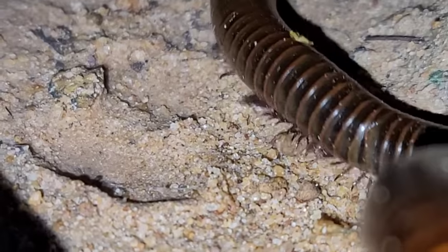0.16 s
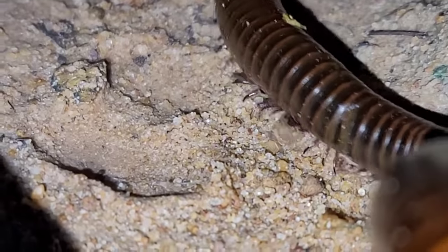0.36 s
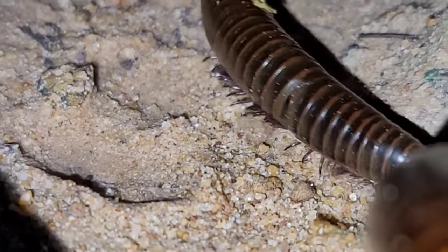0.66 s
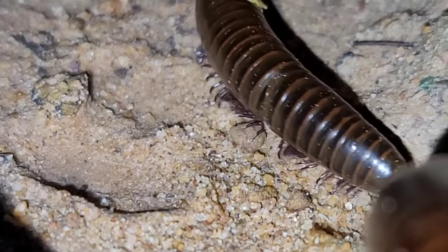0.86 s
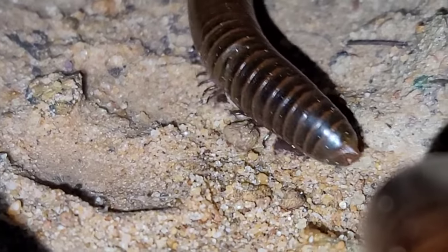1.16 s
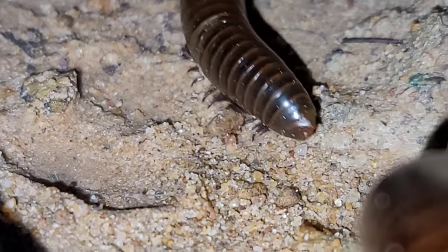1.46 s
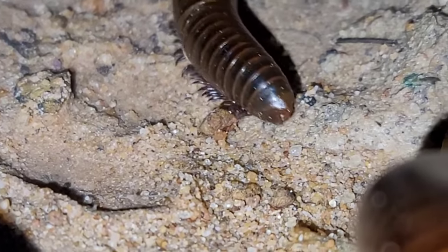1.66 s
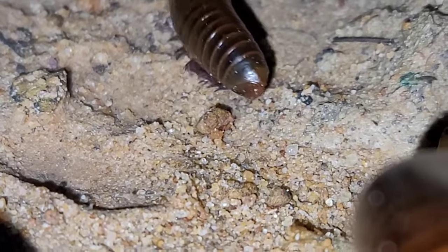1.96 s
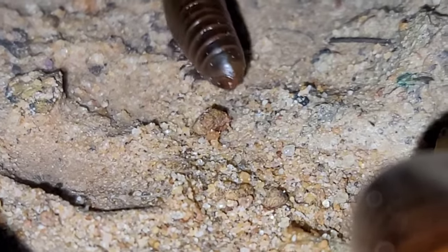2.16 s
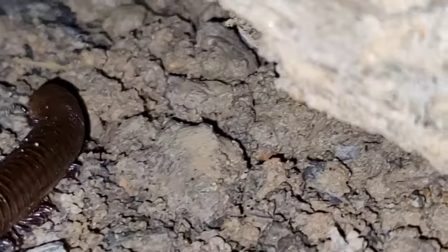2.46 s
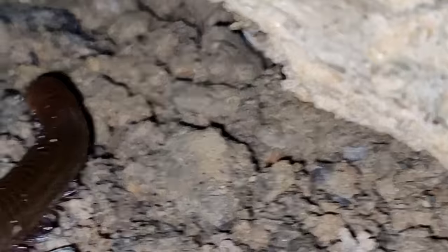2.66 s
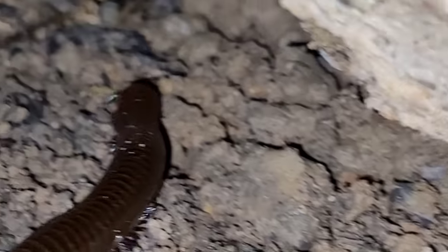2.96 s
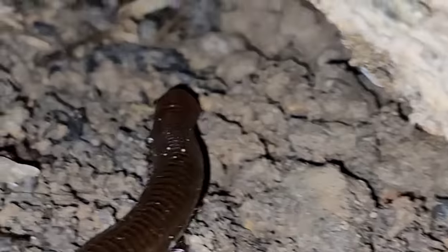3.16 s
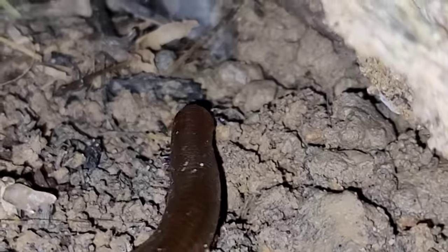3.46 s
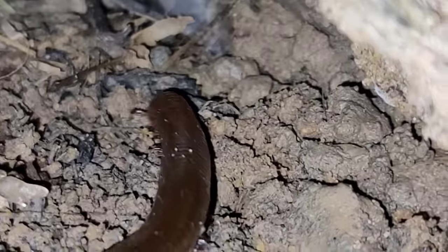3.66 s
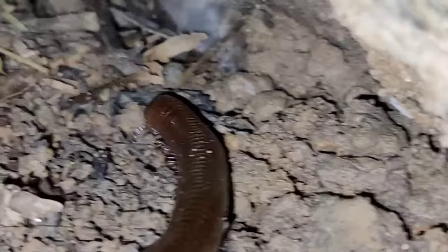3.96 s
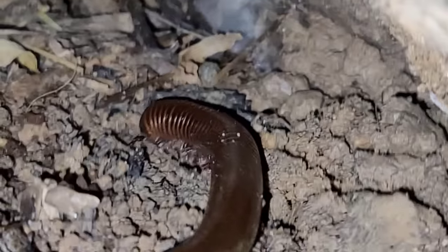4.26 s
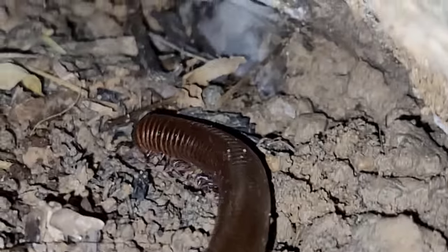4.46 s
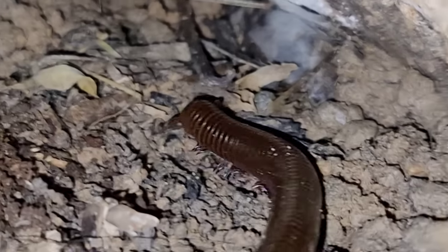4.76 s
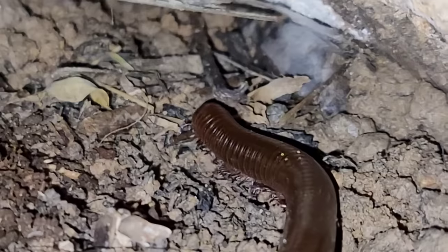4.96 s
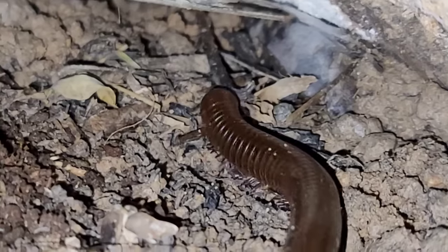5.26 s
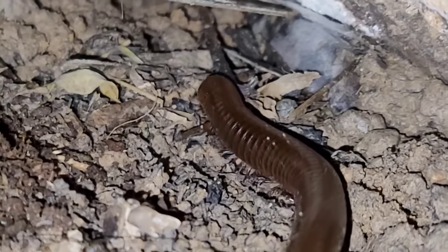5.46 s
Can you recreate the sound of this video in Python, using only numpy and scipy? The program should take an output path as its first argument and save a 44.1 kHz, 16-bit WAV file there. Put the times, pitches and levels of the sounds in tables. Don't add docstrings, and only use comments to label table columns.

```python
import sys
import numpy as np
from scipy import signal
from scipy.io import wavfile
from scipy.ndimage import uniform_filter1d

SR = 44100
rng = np.random.default_rng(int(sys.argv[2]) if len(sys.argv) > 2 else 0)


def bounce(signal):
    frames = np.transpose(np.atleast_2d(signal))
    limited = np.clip(frames, -1, 1)
    pcm = np.round(limited * 32767).astype(np.int16)
    wavfile.write(sys.argv[1], SR, pcm)


def level_to_linear(level):
    exponent = np.asarray(level, float) / 20
    return 10 ** exponent


N = 247401

CUT_S = 2.417
PORT_DIP_HZ, PORT_DIP_WIDTH_HZ = 8230, 920

# (time [s], level [dB], brightness [dB per #
# octave], thump [dB])
SMALL_CRACKS = [(0.212, -48, -12, 13.5), (.288, -45.5, -12, 14), (0.334, -32.5, 0.5, 0),
                (.414, -28.5, -0.5, -11), (0.579, -27, 0.5, -12), (.933, -19.5, -1.5, -15),
                (1.337, -26.5, 0.5, -22), (2.419, -25, -15, -28), (2.611, -26.5, -10, -8.5),
                (2.972, -25, -3, -14), (3.063, -25, 4, -0.5), (3.0779, -3.5, -8.5, -32),
                (3.096, -29, -11, 9.5), (3.159, -21.5, -6.5, -10), (3.285, -19.5, 3, -14),
                (3.562, -16.5, 2.5, -6), (3.713, -13.5, 0, -13), (3.93, -20.5, 1, 0.5),
                (4.056, -23.5, -9, -2), (4.067, -31, -13, 11), (4.178, -7.5, -6, -15.5),
                (4.607, -28, -11, 6.5), (4.644, -8, -1.5, -9.5), (4.675, -27, -13, -3),
                (4.842, -1.5, -19, -12), (4.981, -20.5, -1, -1.5), (5.157, -5, -6.5, -9.5),
                (5.205, -17, -14, 2.5), (5.485, -14.5, -0.5, -2), (5.518, -26.5, -17, 11.5),
                (.594, -39, 3, -8),
    (0.75, -55, 0, -1),
    (0.849, -46, 0, 0),
    (2.725, -30.5, 2, -12),
    (3.148, -42, -4, -4),
    (3.386, -36, 4, 2),
    (4.007, -34, 1, -4),
    (4.461, -39, -10, 11),
    (4.485, -28, -4, -15),
]
# (time [s], level [dB], brightness [dB per octave], thump [dB])
CRUNCHES = [(0.32, -47, 0.5, 4), (0.382, -45.5, 0.5, 18.5), (0.483, -37.5, -1.5, -5),
            (.604, -41.5, 1.5, 13), (0.684, -31.5, 1, 6), (0.813, -34, 0, 11), (1.156, -54.5, 1.5, -5),
            (1.29, -50, -9, -10), (2.484, -36, -3, 11), (2.749, -34, -7, 6.5), (2.826, -28.5, 0, 0.5),
            (2.865, -33, -1, -12), (2.916, -29, -9, -2), (3.086, -35, -13, -7), (3.265, -19.5, -3, -32),
            (3.375, -18, -24, -1), (3.57, -24.5, -22, -18), (3.635, -19, -23, -2.5), (4.167, -14, -0.5, -9),
            (4.299, -12, -18, 2.5), (4.422, -5, -15, -7), (4.477, -29.5, -7, 11), (4.692, -7.5, -19, 3.5),
            (4.778, -13, -14, 1), (4.858, -19, -16, 8), (5.167, -11, -14, -10), (5.178, -9, -16, -4.5),
            (5.492, -17, -1, -18), (5.505, -12, -19, -9), (5.513, -17.5, -18, -27)]
# (time [s], level [dB], brightness [dB per octave], thump [dB])
SCUFFS = [(.165, -62, 1, -4), (0.223, -55.5, 2, 17), (0.498, -45, 2, 23), (2.131, -51.5, -0.5, 27),
          (2.493, -34.5, 0.5, -15), (2.649, -30, -1, 7), (2.731, -32, -2.5, 8), (2.944, -33, -2.5, 7),
          (3.187, -30.5, -10, 5), (3.446, -63, 4, -5), (.268, -49, 1.5, -3), (4.497, -33.5, 1.5, -10),
          (4.52, -30, -0.5, -3), (2.571, -36, 0.5, 7), (2.67, -39, -3, 14), (2.774, -47.5, 2, -6),
          (2.896, -38, -6, -2), (5.038, -40.5, -9, 0), (3.737, -30.5, -1, 10.5), (3.806, -27, -4, 5.5),
          (3.892, -28, -11, 9), (4.038, -21, -.5, -3), (4.219, -25.5, -0.5, 6.5), (4.24, -27, -0.5, 11.5),
          (4.552, -24.5, -6, 10), (4.594, -30, -0.5, 7), (4.679, -20.5, -13, 4), (4.743, -28, -9, 12),
          (4.965, -32, -7, 20.5), (5.561, -38.5, -0.5, 13)]
# (time [s], level [dB], brightness [dB per octave], thump [dB])
DRAGS = [
    (2.556, -37, -0.5, 0),
    (3.648, -40.5, -0.5, 5),
    (3.752, -37.5, 0.5, 2),
    (3.822, -35, 1, 12),
    (3.94, -30.5, -1, 10),
    (4.625, -33, -4.5, 7),
    (4.409, -36, -2, 2),
    (4.506, -25.5, -1.5, 2),
]
# (time [s], level [dB])
RUB_PRESSURE = [(0, -66), (.42, -61.5), (.94, -58.5), (1.07, -70), (1.6, -68.5), (2.06, -67),
                (2.135, -58.5), (2.41, -78), (2.42, -37.5), (2.8, -47.5), (2.94, -39), (3.43, -49.5),
                (4.0, -43), (4.4, -46), (4.516, -28.5), (4.6, -40.5), (5.116, -52), (5.6, -44.5)]
# (time [s], level [dB])
BRIGHT_SNAPS = [(0.504, -36.5), (0.597, -42), (0.605, -41), (.632, -58), (0.688, -49), (0.696, -40.5),
                (.934, -54), (1.919, -58), (2.14, -60), (2.418, -49), (2.495, -37), (2.87, -38), (2.902, -48),
                (2.927, -36.5), (2.974, -39), (3.051, -39), (3.078, -34), (3.089, -41), (3.563, -32.5),
                (4.064, -44), (4.17, -38), (4.553, -51)]
# (start [s], chirps [count], period [s])
CHIRP_BOUTS = [
    (.048, 2, .195),
    (1.124, 1, .197),
    (1.36, 6, .1972),
    (2.545, 3, .1965),
    (3.174, 13, .1972),
]
# (time [s], level [dB])
CRICKET_EFFORT = [
    (0, -2),
    (2.4, -3),
    (2.6, -0.5),
    (3.2, 1),
    (3.6, 3),
    (4.0, 0.5),
    (4.4, -2),
    (5.6, -1),
]
# (time [s], left level [dB], right level [dB])
KATYDID_RASPS = [(0.189, -68, -56), (.55, -66, -58), (.9, -67, -57), (1.27, -67, -62), (1.6, -69, -62),
                 (2.0, -65, -58), (2.35, -66, -56), (2.78, -53, -45), (2.91, -58, -43), (3.19, -55, -44),
                 (3.51, -46, -59), (3.92, -51, -51), (4.06, -54, -57), (4.27, -58, -57), (4.548, -67, -51),
                 (4.78, -59, -53), (5.02, -57, -58), (5.44, -55, -61)]
# (start [s], pitch [Hz], level [dB])
TREE_CRICKET_CALLS = [(.07, 2950, 0), (.43, 3040, 7.5), (.78, 3090, 6), (1.139, 3100, 7), (1.52, 2970, 5.5),
                      (1.87, 2980, 3), (2.18, 3090, 4), (2.55, 3080, 2), (2.901, 3070, 8), (3.241, 3020, 0),
                      (3.651, 3100, 3), (4.03, 3030, -5.5), (4.358, 3180, 7), (4.76, 3070, -7),
                      (5.051, 3140, 8), (5.4, 3020, -9)]
# (low edge [Hz], peak [Hz], high edge [Hz], first place left [dB], right [dB],
# second place left [dB], right [dB])
CHOIRS = [
    (1965, 2334, 2830, 1, 1, 0, 5),
    (3167, 3400, 3920, -4.5, -4.5, -6, 4),
    (4010, 4870, 5260, 8.5, 12, 7, 19),
    (6110, 6550, 7630, -0.5, -8, 0.5, -6),
    (8660, 9320, 9800, -6.5, -11.5, -3, -8),
    (10200, 11210, 11680, -0.5, -1.5, 0.5, 0),
    (11900, 13400, 20500, -8, -13, -8.5, -8),
]
# (first place [dB], second place [dB])
CHOIR_LEVELS = [(-57, -49.5), (-60.5, -49.5)]
# (time [s], level [dB])
HAND_AIM = [(0, 13.5), (.1, 15.5), (.6, 12), (1.05, 9), (1.3, 10.5), (2.41, 10), (2.42, 12), (2.7, 10.5),
            (3.6, 9), (4.3, 5), (5.2, 1), (5.6, 3)]
# (time [s], level [dB])
LEAF_STIRS = [
    (2.69, -61),
    (2.92, -53),
    (4.05, -52),
    (5.02, -57),
    (5.445, -43),
]
# (time [s], level [dB])
TRAFFIC_SWELL = [(0.0, -37), (0.59, -40), (0.69, -33), (1.26, -38), (1.3, -27), (1.46, -37.5), (1.51, -33),
                 (1.59, -42.5), (1.9, -33.5), (2.24, -40), (2.39, -29), (2.42, -37.5), (4.8, -30.5),
                 (5.13, -35), (5.21, -20), (5.26, -34.5), (5.54, -32), (5.6, -36)]
# (frequency [Hz], level [dB per Hz])
TRAFFIC_COLOUR = [(13, -46), (22, -18), (52, -9.5), (74, 0.5), (120, -10.5), (144, -19), (240, -49.5),
                  (300, -29), (436, -49), (580, -41), (1800, -96), (2340, -105), (3960, -120)]
# (frequency [Hz], likeness [0 to 1])
TRAFFIC_LIKENESS = [(60, 0.85), (200, 0.77), (500, 0.34), (1000, 0.038)]


def rms_one(x):
    return x / np.sqrt(np.mean(x ** 2, axis=-1, keepdims=True) + 1e-20)


def in_time(rows):
    s, *columns = np.transpose(rows)
    return [np.interp(np.arange(N) / SR, s, column) for column in columns]


def by_place(first, second):
    return np.where(np.arange(N) < CUT_S * SR, first, second)


def band(x, low_hz, high_hz, order=2):
    sections = signal.butter(order, [low_hz, high_hz], "band", fs=SR, output="sos")
    return signal.sosfilt(sections, x)


def resonance(x, hz, width_hz):
    r = np.exp(-np.pi * width_hz / SR)
    top = np.array([1, 0, -1]) * (1 - r * r) / 2
    return signal.lfilter(top, [1, -2 * r * np.cos(2 * np.pi * hz / SR), r * r], x)


def drift(rate):
    knots = rng.standard_normal((2, 400))
    place = np.arange(N) / SR * rate
    return np.array([np.interp(place, np.arange(400), k) for k in knots])


def bursts(times, levels_db, lengths_s, rise=0.39, grain=None):
    out = np.zeros(N + SR)
    for s, db, length in zip(times, levels_db, lengths_s):
        x = np.arange(int(3 * length * SR)) / (length * SR * rise)
        at = int(s * SR)
        hump = x * np.exp(1 - x)
        if grain is not None:
            filled = rms_one(hump * grain[at % (N - SR):][:len(x)])
            hump = filled * np.sqrt(np.mean(hump ** 2))
        out[at:at + len(x)] += level_to_linear(db) * hump
    return out[:N]


def tiny_snaps(per_s, spread_db):
    sizes = level_to_linear(spread_db * np.minimum(rng.exponential(1, N), 4)) * rng.choice([-1, 1], N)
    return rms_one(sizes * (rng.random(N) < per_s / SR) + 1e-9)


def crackle():
    cracks = SMALL_CRACKS
    s, db, bright, thump_db = np.transpose(cracks + CRUNCHES + SCUFFS + DRAGS)
    crack_s = 0.00216
    counts = [len(cracks), len(CRUNCHES), len(SCUFFS), len(DRAGS)]
    size_s = np.repeat([crack_s, 0.00524, 0.0098, 0.0145], counts)
    sharp = (size_s == crack_s) & (bright > -6)
    grain_db = db - 7 * sharp
    out = clean_breaks(s[sharp], db[sharp], bright[sharp])
    out += slips(s, grain_db, bright, 0.94 * size_s)
    out += knocks(s, db + thump_db, 0.94 * size_s)
    out += rubbing(s, db)
    out += bright_snaps()
    leak = band(out, 160, 5300) * level_to_linear(by_place(-19.5, -75))
    return np.array([leak, out])


def clean_breaks(s, db, bright):
    breaks = np.zeros(N)
    breaks[((s + .0005) * SR).astype(int)] = -level_to_linear(db + 19 + 1.0 * bright)
    return band(band(breaks, 500, 2200, order=1), 150, 8100)


def slips(s, db, bright, length_s):
    grains = tiny_snaps(1500, 4.4)
    body = bursts(s, db + 14.5, length_s, grain=grains)
    middle = bursts(s, db + 5.9 * bright + 12.5, 0.32 * length_s, grain=grains)
    treble = bursts(s, db + 7.2 * bright + 2.0, 0.53 * length_s, grain=grains)
    out = band(band(body, 284, 1280, order=1), 177, 1730, order=1)
    return out + band(middle, 950, 3600) + band(treble, 4000, 4300)


def knocks(s, db, length_s):
    push = signal.lfilter([1, -1], [1], bursts(s, db + 41.5, 0.86 * length_s))
    return band(push, 48, 266)


def rubbing(s, db):
    rub = rms_one(band(tiny_snaps(1300, 2.7), 87, 950) + 0.39 * band(tiny_snaps(1500, 2.4), 1440, 4050))
    pressure = level_to_linear(in_time(RUB_PRESSURE)[0] + 2.0 * drift(20)[0])
    pressure += bursts(s, 0.52 * db - 30.5, 0.017 + 0 * s)
    return rub * pressure * level_to_linear(4.7 * drift(60)[0])


def bright_snaps():
    s, db = np.transpose(BRIGHT_SNAPS)
    snaps = bursts(s - .0005, db + 21.0, 0.00096 + 0 * s, grain=rng.standard_normal(N))
    return band(snaps, 2400, 9200, order=1)


def cricket():
    chirps = np.concatenate([start + period * np.arange(count) for start, count, period in CHIRP_BOUTS])
    dry = np.zeros(N + SR)
    for s in chirps:
        chirp_db = -1.5 * rng.standard_normal()
        for k, stroke_db in enumerate((-2.5, 0.5, 0.5)):
            add_stroke(dry, s - .0055 + k * .0377, chirp_db + stroke_db)
    heard = through_foliage(dry[:N])
    heard = band(heard, 3900, 5320, order=7)
    level_db = by_place(-36.5, -27) + in_time(CRICKET_EFFORT)[0]
    left_against_right_db = [by_place(-3, -6.5), np.zeros(N)]
    return heard * level_to_linear(left_against_right_db + level_db)


def add_stroke(dry, start_s, db):
    pulses, pulses_per_s = 5, 300
    start_hz, end_hz, ring_s, rise_s = 5300, 4600, 0.0013, 0.00042
    t = np.arange(int(0.011 * SR)) / SR
    along = np.linspace(0, 1, num=pulses)
    luck = rng.standard_normal((3, pulses))
    at = ((start_s + np.arange(pulses) / pulses_per_s + .00025 * luck[0]) * SR).astype(int)
    hz = start_hz + (end_hz - start_hz) * along + 70 * luck[1]
    gain = level_to_linear(db + 19 - 19 * (along - .33) ** 2 + 1.7 * luck[2])
    for i, f, g in zip(at, hz, gain):
        ring = np.sin(2 * np.pi * f * t) * (1 - np.exp(-t / rise_s)) * np.exp(-t / ring_s)
        dry[i:i + len(t)] += g * ring


def through_foliage(dry):
    tail = np.arange(int(.15 * SR)) / SR
    foliage = rng.standard_normal((2, len(tail))) * np.exp(-tail / .028)
    foliage *= level_to_linear([[-3], [-5.5]]) / np.sqrt(np.sum(foliage ** 2, axis=1, keepdims=True))
    foliage[[0, 1], [7, 0]] += (0.25, 0.9)
    echo_s = np.array((0.013, .019))
    foliage[[0, 1], (echo_s * SR).astype(int)] += (0.5, 0.35)
    return signal.fftconvolve(dry[None], foliage)[:, :N]


def katydid():
    ticks_per_s = 423.4
    s, left_db, right_db = np.transpose(KATYDID_RASPS)
    clicks = np.diff(np.floor(np.arange(N + 1) * ticks_per_s / SR))
    even = rms_one(clicks * level_to_linear(1.5 * rng.standard_normal(N)))
    sides = []
    for db in (left_db, right_db):
        ticks = rms_one(band(even + 0.81 * tiny_snaps(2500, 2.7), 11600, 14700, order=3))
        sides.append(bursts(s - .015, db, 0.055 + 0 * s) * ticks)
    return np.array(sides)


def tree_cricket():
    width_hz, count = 110, int(.18 * SR)
    out = np.zeros((2, N + SR))
    for s, hz, db in TREE_CRICKET_CALLS:
        tone = resonance(rng.standard_normal((2, SR // 4)), hz, width_hz)
        tone = resonance(tone, hz, 2 * width_hz)[:, -count:]
        at = int(s * SR)
        out[:, at:at + count] += level_to_linear(db) * rms_one(tone) * np.hanning(count) ** .5
    return out[:, :N] * level_to_linear([by_place(-62, -55), by_place(-61, -53)])


def choirs():
    aim_db = in_time(HAND_AIM)[0]
    sway_db = 1.5 * drift(3.37)
    low, high = [by_place(*levels) for levels in CHOIR_LEVELS]
    low = np.array([low, low + by_place(-2, -4) + 0.31 * aim_db]) + sway_db
    high = np.array([high, high + aim_db])
    out = np.zeros((2, N))
    for low_hz, hz, high_hz, left1, right1, left2, right2 in CHOIRS:
        voices = band(rng.standard_normal((2, N)), low_hz, high_hz, order=7)
        voices = rms_one(resonance(voices, hz, 0.7 * (high_hz - low_hz)))
        reach_db = low if hz < 5600 else high
        flicker_db = 2.01 if hz < PORT_DIP_HZ else .7
        place_db = [by_place(left1, left2), by_place(right1, right2)]
        out += voices * level_to_linear(reach_db + place_db + flicker_db * drift(15))
    thin = resonance(rng.standard_normal((2, N)), 2638, 31)
    return out + rms_one(thin) * level_to_linear(low + by_place(-8, -4) + 1.8 * drift(4.45))


def stirs():
    s, db = np.transpose(LEAF_STIRS)
    leaves = rms_one(band(tiny_snaps(5000, 2.1), 750, 3200))
    return np.outer([1, 0], leaves * bursts(s, db - 1.0, 0.022 + 0 * s))


def rumble():
    out = np.zeros((2, N))
    level_db = in_time(TRAFFIC_SWELL)[0]
    colour_hz, colour = np.transpose(TRAFFIC_COLOUR)
    likeness_hz, likeness = np.transpose(TRAFFIC_LIKENESS)
    edges = 20 * 2 ** np.arange(0, 6.4, 1 / 3)
    white = rng.standard_normal((2, 2, N))
    for k, (low, high) in enumerate(zip(edges, edges[1:])):
        mid, side = band(white[k % 2], low, high)
        log_hz = np.log(low * high) / 2
        alike = np.clip(np.interp(log_hz, np.log(likeness_hz), likeness), 0, 1)
        colour_db = np.interp(log_hz, np.log(colour_hz), colour)
        swell_db = level_db + 3.4 * drift(6)[0] if low < 150 else by_place(-33.5, -32.0)
        both = np.sqrt(1 + alike) * mid + np.sqrt(1 - alike) * side * [[1], [-1]]
        out += level_to_linear(colour_db + swell_db) * both
    return out * level_to_linear(26.5) * level_to_linear([[-1.2], [1.2]])


def scene():
    near = crackle() + cricket() + katydid() + tree_cricket()
    return near + choirs() + stirs() + rumble()


def drop_faint(x):
    from_hz, top_hz = 2800, 15800
    hz, _, z = signal.stft(x, SR, nperseg=2048)
    level_db = 20 * np.log10(np.abs(z) + 1e-12)
    usual_db = level_db[:, (hz > 6000) & (hz < 12000)].mean(axis=1, keepdims=True)
    mids_db = level_db[:, (hz > 300) & (hz < 5500)].mean(axis=1, keepdims=True) - usual_db
    which = np.arange(len(hz)) // 24
    centre = np.minimum(which * 24 + 12, len(hz) - 1)
    band_db = uniform_filter1d(level_db, size=24, axis=1)[:, centre]
    flutter = rng.standard_normal((1, which[-1] + 1, z.shape[2]))[:, which]
    flutter = flutter[:, :, np.arange(z.shape[2]) // 2]
    limit_db = usual_db + .55 * (mids_db - mids_db.mean()) - 6.5 + 2.6 * flutter
    limit_db += 2.8 * np.clip((hz[:, None] - 11500) / (top_hz - 11500), 0, 1) ** .5
    for gap_hz in (2980, 5850):
        limit_db += 5 * np.exp(-((hz[:, None] - gap_hz) / 170) ** 2)
    strong = (level_db > limit_db) & (band_db > limit_db - 4)
    keep = (strong | (hz[:, None] < from_hz)) & (hz[:, None] < top_hz)
    return signal.istft(z * keep, SR, nperseg=2048)[1][:, :N]


def low_pass(x):
    return signal.sosfilt(signal.butter(12, 16520, fs=SR, output="sos"), x)


def record(dry):
    dipped = dry - .9 * resonance(dry, PORT_DIP_HZ, PORT_DIP_WIDTH_HZ)
    rounded = 0.84 * np.tanh(dipped / 0.97)
    mix = drop_faint(rounded)
    return low_pass(mix)


dry = scene()
out = record(dry)
bounce(out)
```